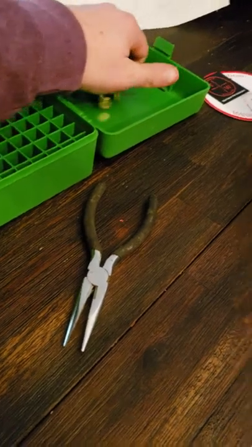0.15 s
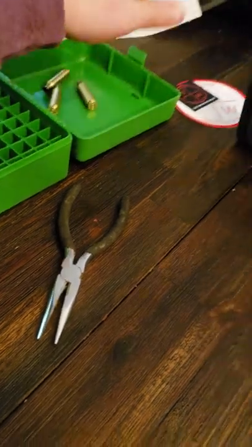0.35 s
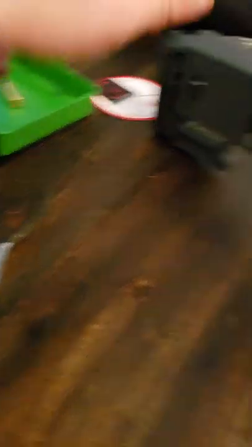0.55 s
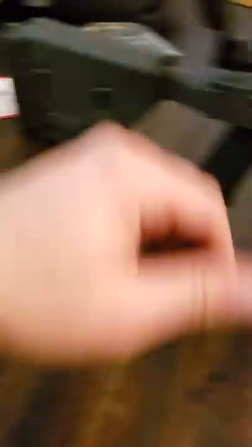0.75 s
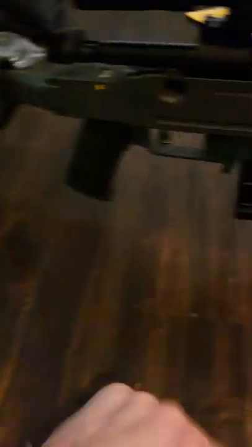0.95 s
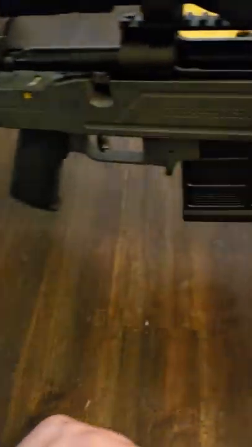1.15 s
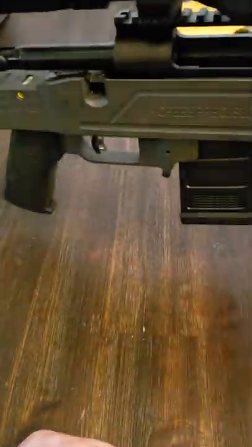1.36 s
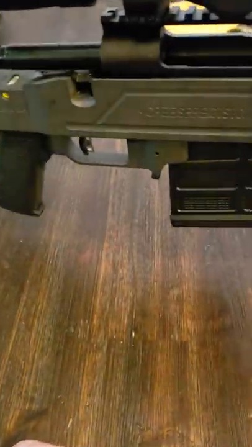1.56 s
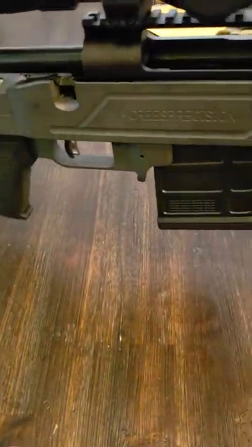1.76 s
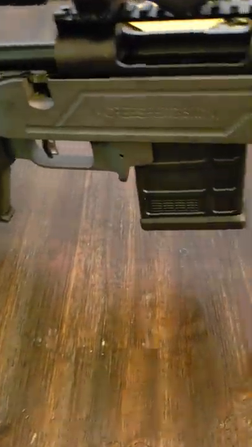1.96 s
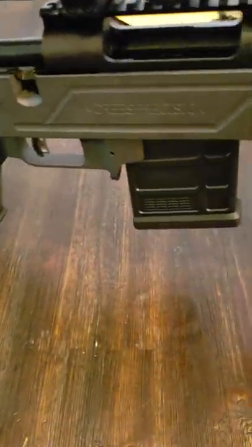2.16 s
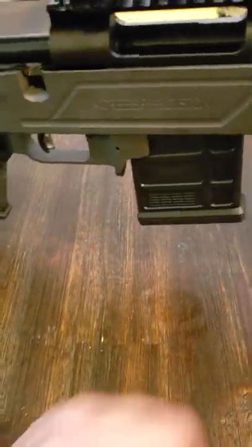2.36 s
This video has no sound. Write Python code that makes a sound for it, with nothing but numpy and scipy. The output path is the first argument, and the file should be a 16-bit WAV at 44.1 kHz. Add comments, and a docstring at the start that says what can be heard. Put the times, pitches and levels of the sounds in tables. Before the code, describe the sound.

Empty brass cases clatter into a thin plastic lid with a brief high ring, then a rifle settles softly on a wooden table and its parts tick and click, close up in a small quiet room.

```python
"""Heard close, on a phone with two microphone ports in a small room: faint ticks, then spent brass cases
drop into a plastic box lid, rattle and ring. A rifle is set down on a wooden table and handled; its loose parts
tick and it slides on the wood. Room tone, hum and hiss run throughout. Blows are short noise cracks plus
decaying modes; rattle and rustle are noise grains; the room's answer is a decaying noise tail."""
import sys
import numpy as np
from scipy import signal
from scipy.fft import rfft, irfft
from scipy.io import wavfile

SR = 44100
rng = np.random.default_rng(int(sys.argv[2]) if len(sys.argv) > 2 else 0)


def output_pcm(signal):
    """Save a mono or channel-first signal as 16-bit PCM at the path in sys.argv[1].

    Samples are clipped to [-1, 1] before scaling.
    """
    pcm = np.clip(np.atleast_2d(signal).T, -1, 1) * 32767
    wavfile.write(sys.argv[1], SR, np.round(pcm).astype(np.int16))


def volts_from_db(level):
    """Convert decibel levels to linear amplitude ratios."""
    exponent = np.asarray(level, float) / 20
    return 10 ** exponent


N = 105840
T = np.arange(N) / SR
PORTS = np.array([[1], [-1]])  # sign of a side signal at the left and right port

# Modes of the plastic lid. Each row: frequency in Hz, relative level in dB, t60 in seconds.
LID_MODES = [(143.6, -20, .15), (285.3, -8, .15), (407, -5, 0.12), (549, -1, 0.033), (879, -6, 0.0604),
             (1199.4, 1.5, .06), (1780, 4.5, 0.0482), (2118, 0, 0.037), (2500, 2, 0.013),
             (2867, -13, 0.052), (3600, 0.5, 0.021), (4530, -2, 0.027)]
# Modes of the wooden table. Each row: frequency in Hz, relative level in dB, t60 in seconds.
TABLE_MODES = [(45.8, -18.5, 0.38), (164, 3, 0.041), (272.6, -3, .15), (396.8, -4.5, 0.21), (522, 4, 0.066),
               (640.7, 3, 0.055), (934, -4, 0.15), (1132, 1.5, 0.034), (1266, 4, 0.052)]


def unit(x):
    """Scale to rms 1."""
    return x / np.sqrt(np.mean(x ** 2))


def band(x, lo_hz, hi_hz, order=2):
    """Keep the sound between two frequencies with a Butterworth band-pass."""
    sos = signal.butter(order, [lo_hz, min(hi_hz, .45 * SR)], "band", fs=SR, output="sos")
    return signal.sosfilt(sos, x)


def curve(rows, col):
    """Gain over time, from a dB column against seconds in the first column."""
    rows = np.array(rows)
    return volts_from_db(np.interp(T, rows[:, 0], rows[:, col]))


def pan(x, db):
    """Make the left port louder than the right by db."""
    return x * volts_from_db(db / 2 * PORTS)


def pair(n, wide):
    """Noise at the two ports: 0 is alike, 1 is unrelated."""
    mid, side = rng.standard_normal((2, n))
    return (mid + wide * side * PORTS) / np.sqrt(1 + wide ** 2)


def add(out, x, s):
    """Mix a short sound in at s seconds."""
    i = int(s * SR)
    out[:, i:i + x.shape[1]] += x[:, :N - i]


def ring(modes, push_s):
    """A struck body: each resonance is three close modes, differing in phase at the two ports."""
    detune, scatter_db, side_hz = .07, 3, 580  # above side_hz the phase difference is full
    t = np.arange(SR // 4)[:, None] / SR
    hz, db, t60 = np.repeat(np.array(modes), 3, axis=0).T
    level_draw, tune_draw, sign_draw, lean_draw = rng.standard_normal((4, len(hz)))
    phase = 2 * np.pi * hz * (1 + detune * tune_draw) * t
    swell = 1 - np.exp(-t / push_s)
    gain = np.sign(sign_draw) * volts_from_db(db + scatter_db * level_draw) * 1000 ** (-t / t60) * swell
    lean = lean_draw * np.minimum(hz / side_hz, 1) ** 2
    x = np.array([(gain * np.sin(phase + k * lean)).sum(axis=1) for k in (1, -1)])
    return x / np.sqrt(np.mean(x[:, :SR // 50] ** 2))  # rms 1 over the first 20 ms


def blows(rows, modes, push_s, crack_s, knock_share=1):
    """Each blow is a short coloured crack at the contact, and the ring of the struck body."""
    knock_cycles, tone_q, grit = 2.6, 2.0, .35  # grit: noise share of the crack's colour
    out, t = np.zeros((2, N)), np.arange(SR // 25) / SR
    for s, db, hz, treble_db, body_db, pan_db in rows:
        burst = pair(len(t), 1) * (1 - np.exp(-t / crack_s * 10)) * np.exp(-t / crack_s)
        # the contact's own ring
        knock = np.sin(2 * np.pi * hz * t + .5 * PORTS) * np.exp(-t * hz / knock_cycles)
        colour = grit * burst + knock_share * knock
        tone = band(colour, hz * (1 - .5 / tone_q), hz * (1 + .5 / tone_q))
        treble = band(burst, 1383, 19000)
        crack = (unit(tone) + volts_from_db(treble_db) * unit(treble)) / unit(burst).max()
        lean_db = np.clip(pan_db, -6, 6)
        add(out, pan(crack * volts_from_db(db), lean_db), s)
        add(out, pan(ring(modes, push_s) * volts_from_db(body_db), lean_db / 2), s)
    return out


def grains(per_s, spread_db):
    """Random short noise bursts of uneven size, each dying away with a 1.2 ms time constant."""
    chance, size_draw = rng.random((2, N))
    size = (chance < per_s / SR) * volts_from_db(-spread_db * np.log(size_draw))
    envelope = signal.lfilter([1], [1, -np.exp(-1 / (.0012 * SR))], size)
    return envelope * pair(N, 0.86)


def case_drops():
    """Brass cases strike the lid: a hard crack, then the plastic's modes."""
    # Each row: start in seconds, crack level in dB, crack colour in Hz, treble against that colour in dB,
    # lid ring in dB, left minus right in dB before limiting.
    case_hits = [(.2313, -12, 3720, 5.5, -29.5, 7), (.246, -7, 3700, -2, -22.5, -2.5),
                 (.2745, -8, 1760, -1, -25.5, -6.5), (.2955, -9, 1390, -8, -31, 0.5),
                 (.2978, -5.5, 5430, 1, -21, -2), (.304, -8.5, 1000, -9.5, -34, -18),
                 (.3277, -10, 2030, -27, -31.5, -0.5), (.4948, -19, 2185, -18, -36.5, -3),
                 (.5322, -21.5, 3600, -2.5, -38.5, -5.5), (.5446, -21.5, 2660, -36.5, -40.5, 4.5)]
    return blows(case_hits, LID_MODES, push_s=0.000542, crack_s=.0019)


def rattle():
    """Cases rattle in the lid: small knocks between the drops, which also shake its modes."""
    # Each row: time in seconds, level of the knocks' main band in dB.
    rattle_swell = [(.229, -62.5), (.236, -31.5), (.25, -23), (.29, -18.5), (.312, -21.5), (.35, -37.5),
                    (.42, -71)]
    knocks = grains(1600, 3.35)
    lid = signal.fftconvolve(knocks[:1], ring(LID_MODES, 0.0001))[:, :N]
    body = unit(band(knocks, 3240 / 2, 3240 * 1.19))
    treble = unit(band(knocks, 6500, 16000))
    on = (T > rattle_swell[0][0]) & (T < rattle_swell[-1][0])
    return on * curve(rattle_swell, 1) * (body + volts_from_db(-13.5) * treble + volts_from_db(-4.5) * unit(lid))


def brass():
    """The one high mode of a case mouth, swelling after a knock and cut off by the next touch."""
    # Each row: start in seconds, level in dB before a common lift, free ringing in seconds, frequency in Hz.
    case_rings = [(.161, -62, .03, 11250), (.234, -24, .011, 11262), (.248, -17, .027, 11262),
                  (.278, -19, .021, 11262), (.301, -31, .015, 11262), (.318, -43, .17, 11262),
                  (.533, -52, .065, 11230), (1.238, -58, .035, 11200), (1.277, -52, .042, 11200),
                  (1.583, -68, .02, 11200), (2.036, -53, .052, 11150)]
    t60_s, rise_s, damp_s = .3, .004, .003
    lift_db, waver_db = 2.9, 2.5  # the ring's level wavers irregularly
    out, t = np.zeros((2, N)), np.arange(SR // 3) / SR
    for s, db, free_s, hz in case_rings:
        shape = (1 - np.exp(-t / rise_s)) * 1000 ** (-t / t60_s)
        shape = shape * np.exp(-np.maximum(t - free_s, 0) / damp_s)
        waver = unit(band(rng.standard_normal(len(t)), 20, 90))
        shape = shape * volts_from_db(db + lift_db + waver_db * waver)
        tone = np.sin(2 * np.pi * hz * t + .55 * PORTS)  # the ports hear opposite phase leads
        add(out, pan(shape * tone, 3), s)
    return out


def rifle_set_down():
    """The rifle meets the table: longer noise cracks without a contact tone, and the wood's modes."""
    # Each row: start in seconds, crack level in dB, crack colour in Hz, treble against that colour in dB,
    # table ring in dB, left minus right in dB before limiting.
    thuds = [(1.0525, -31, 1221, -16, -28, -1), (1.061, -30.5, 3440, -2.5, -32, 3),
             (1.0725, -30.5, 2500, -11, -38, -7)]
    return blows(thuds, TABLE_MODES, push_s=0.00047, crack_s=0.0106, knock_share=0)


def part_ticks():
    """Parts tick under the hand, from faint to very loud, leaving the table's lowest modes still."""
    # Each row: start in seconds, crack level in dB, crack colour in Hz, treble against that colour in dB,
    # table ring in dB, left minus right in dB before limiting.
    tick_hits = [(.1606, -50, 3630, -4.5, -89, 5), (.1945, -54.5, 3600, 3.5, -77, 1),
                 (.9243, -59, 2616, 3, -76, -5), (1.0067, -50.5, 2500, -9.5, -60.5, -2.5),
                 (1.2107, -27.5, 5370, -7.5, -54, 1), (1.226, -39, 13000, -0.5, -75, 2),
                 (1.2371, -35, 13900, -10, -49.5, -2), (1.2474, -36, 15100, -19, -60, 8),
                 (1.26, -34, 5280, -2, -43.5, 7), (1.2744, -47, 5000, -2, -59, 14),
                 (1.282, -43.5, 13750, 0, -43.5, -8), (1.293, -26.5, 2160, -21.5, -46, 0),
                 (1.5144, -52, 1860, -16, -60.5, -2), (1.5833, -56, 11500, 10, -62.5, 5),
                 (1.6033, -44, 2230, -8, -53, 16), (1.7609, -49.5, 1510, -15, -54.5, -1.5),
                 (1.8627, -19.5, 2743, -8, -36.5, -16), (1.9485, -28, 2940, -13.5, -45, -1.5),
                 (2.0009, -41, 2660, -19, -55, -4), (2.0302, -8.5, 2624, -11.5, -37.5, 0.5),
                 (2.1605, -56.5, 12180, 9, -69, 1)]
    stiff = [mode for mode in TABLE_MODES if mode[0] > 240]
    return blows(tick_hits, stiff, push_s=0.00052, crack_s=.0016)


def slide():
    """Hands and stock slide on wood: rubbing feeds the table's low resonances, fine grit rustles above."""
    # Each row: time in seconds, low rub level in dB, rustle level in dB.
    slide_swell = [(0, -67, -77.5), (.1, -95, -82.5), (.17, -88, -71), (.22, -78, -76), (.6, -70.5, -75.5),
                   (.72, -90.5, -80), (.86, -70, -85.5), (.98, -68.5, -74.5), (1.1, -59, -52),
                   (1.2, -67, -62), (1.22, -71, -44), (1.3, -58.5, -54.5), (1.38, -74, -64),
                   (1.48, -58.5, -68.5), (1.62, -61, -69), (1.85, -57, -68.5), (1.95, -58.5, -58),
                   (2.12, -63, -60.5), (2.24, -80, -81), (2.4, -69.5, -73.5)]
    # The rubbed resonances, in Hz.
    rub_hz = (290, 410, 540)
    rub = sum(unit(band(pair(N, 0.49), hz / 1.264, hz * 1.078)) for hz in rub_hz)
    rustle = band(grains(4000, 3), 2200 / 2.2, 2200 * 2)
    return unit(rub) * curve(slide_swell, 1) + unit(rustle) * curve(slide_swell, 2)


def room(x):
    """The room's answer: a decaying noise tail per band, with the bass more alike at the two ports."""
    # Each row: band centre in Hz, relative level in dB, t60 in seconds.
    room_bands = [(150, -23.5, 0.33), (370, -27.5, 0.35), (1000, -29.5, 0.26), (2500, -29, 0.23),
                  (5750, -36.5, 0.29), (10730, -29.5, 0.16)]
    t, tail = np.arange(SR * 3 // 4) / SR, 0
    for hz, db, t60 in room_bands:
        wide = min(hz / 537 / 2, 1)
        noise = unit(band(pair(len(t), wide), hz / 1.66, hz * 1.575))
        scale = np.sqrt(hz / t60) / SR * 10 ** 2
        tail = tail + volts_from_db(db) * noise * 1000 ** (-t / t60) * scale
    tail = tail * (1 - np.exp(-t / .002))  # the answer builds up over some 2 ms
    return signal.fftconvolve(x.mean(axis=0)[None], tail)[:, :N]


def room_tone():
    """Steady noise shaped over frequency, its treble less alike at the two ports."""
    # Each row: frequency in Hz, relative level in dB per Hz.
    tone_spectrum = [(15, -42), (28, -10), (60, -12.5), (100, -9), (150, -15), (300, -18), (450, -25.5),
                     (700, -35.5), (2000, -45), (4000, -35), (8000, -40), (16000, -38)]
    f = np.fft.rfftfreq(N, 1 / SR) + 1
    hz, db = np.array(tone_spectrum).T
    mid, side = rfft(rng.standard_normal((2, N))) * volts_from_db(np.interp(np.log(f), np.log(hz), db))
    wide = np.clip(f / 1500, .15, .9)
    return unit(irfft(mid + wide * side * PORTS, N)) * volts_from_db(-71)


def hum():
    """Bands of noise, narrow in the bass, that swell and sink together."""
    # Each row: frequency in Hz, level in dB before the swell, width in Hz.
    hum_bands = [(86, -68, 8.2), (129.5, -64.5, 11), (3600, -85, 20), (6260, -83.5, 350),
                 (6900, -82.5, 240)]
    # Each row: time in seconds, gain on the bands in dB.
    hum_swell = [(0, 1.5), (.3, 5), (.65, -4), (.9, -4.5), (1.3, -2), (1.6, 6), (2.4, 5)]
    total = 0
    for hz, db, width_hz in hum_bands:
        noise = pair(N, min(hz / 1500, .9))
        total = total + volts_from_db(db) * unit(band(noise, hz - width_hz / 2, hz + width_hz / 2, order=1))
    return total * curve(hum_swell, 1)


def hiss():
    """A swelling top hiss, with a weaker noise band just below it."""
    # Each row: time in seconds, level of the top band in dB.
    hiss_swell = [(0, -81), (.15, -67), (.45, -66), (.75, -96.5), (1.0, -72.5), (1.09, -71), (1.2, -71),
                  (1.45, -80.5), (1.58, -73), (1.8, -89.5), (2.1, -72.5), (2.28, -77), (2.4, -58.5)]
    top_band = unit(band(pair(N, 0.99), 10800, 15000, order=4))
    lower_band = unit(band(pair(N, 1.0), 5000, 10800))
    return (top_band + volts_from_db(-8.5) * lower_band) * curve(hiss_swell, 1)


def scene():
    """All blows and the rattle excite the room; the quiet layers stand alone."""
    near = case_drops() + rifle_set_down() + part_ticks() + rattle()
    return near + room(near) + brass() + slide() + room_tone() + hum() + hiss()


def low_pass(x):
    """Removes everything above the highest recorded frequency."""
    return signal.sosfilt(signal.butter(12, 17150, fs=SR, output="sos"), x)


def record(dry):
    """The phone rounds the peaks and cuts the top with a steep low-pass at 15750 Hz."""
    rounded = np.tanh(dry)
    top_cut = signal.ellip(4, .5, 26, 15750, fs=SR, output="sos")  # .5 dB ripple, 26 dB stopband
    mix = signal.sosfilt(top_cut, rounded)
    return low_pass(mix)


dry = scene()
out = record(dry)
output_pcm(out)
```